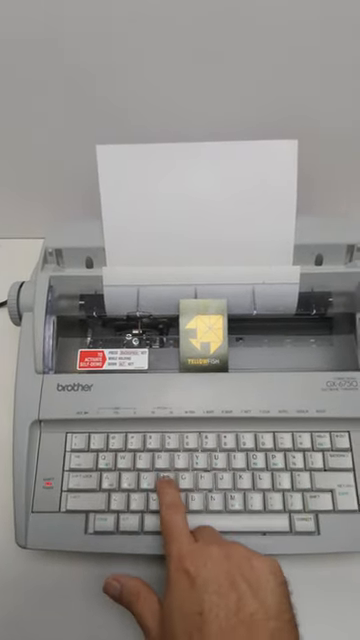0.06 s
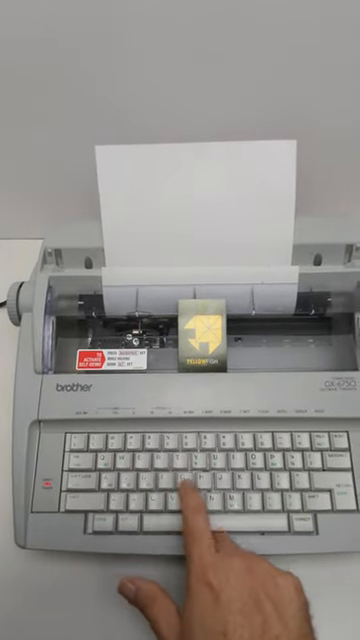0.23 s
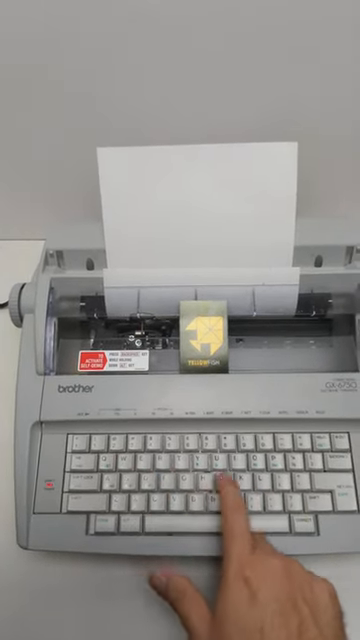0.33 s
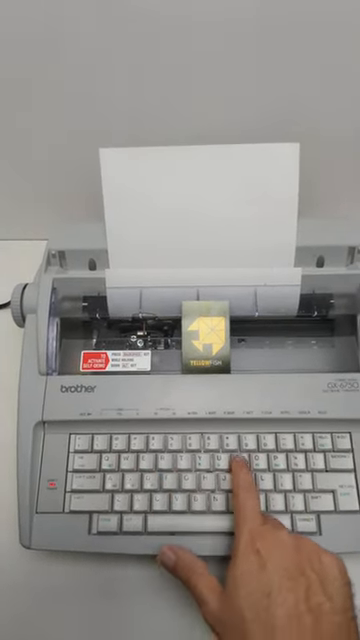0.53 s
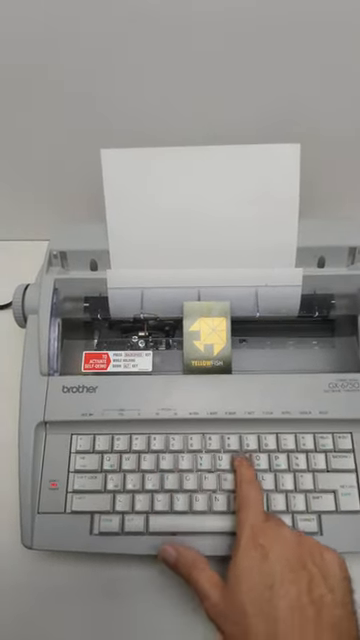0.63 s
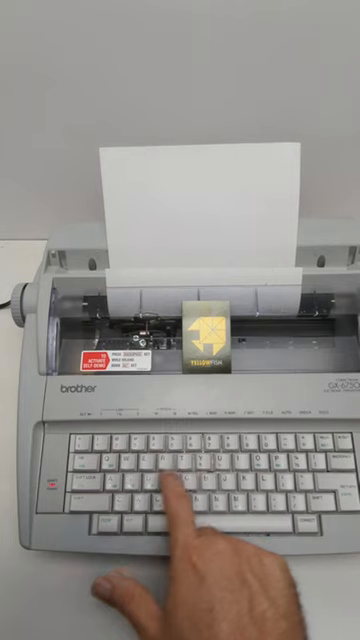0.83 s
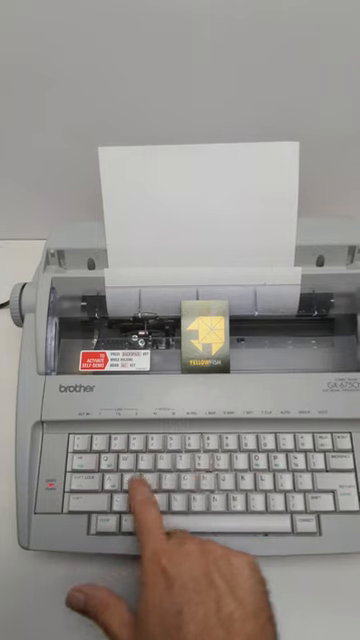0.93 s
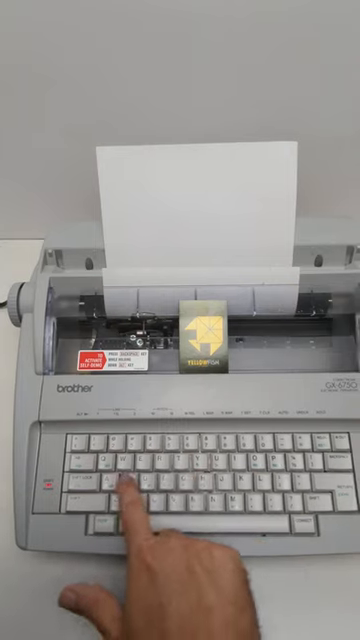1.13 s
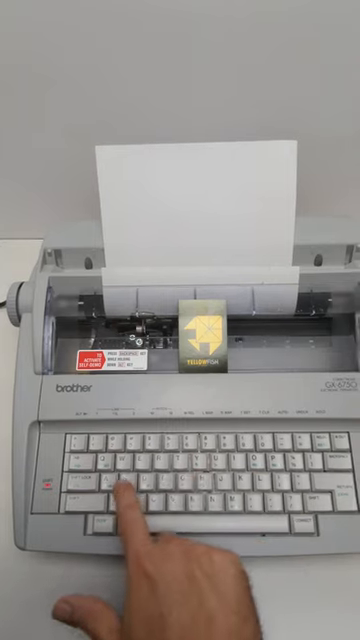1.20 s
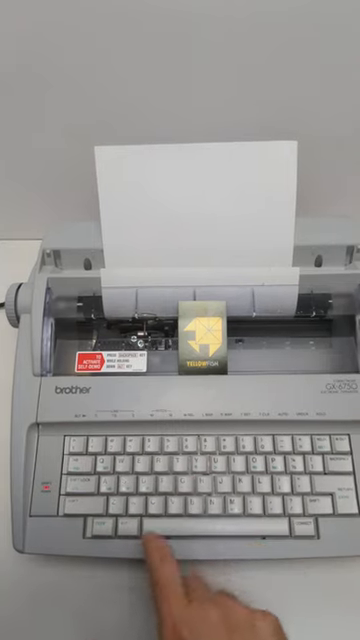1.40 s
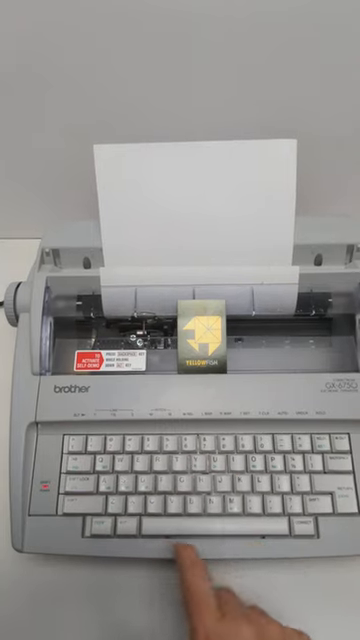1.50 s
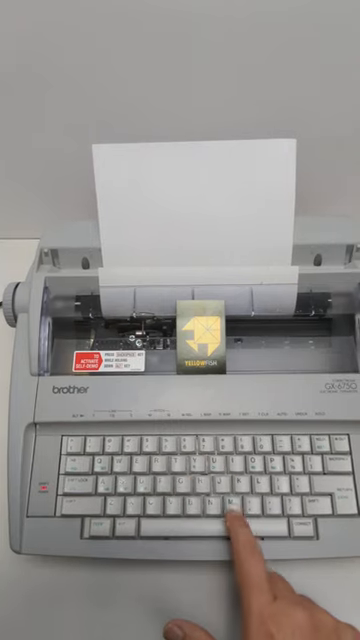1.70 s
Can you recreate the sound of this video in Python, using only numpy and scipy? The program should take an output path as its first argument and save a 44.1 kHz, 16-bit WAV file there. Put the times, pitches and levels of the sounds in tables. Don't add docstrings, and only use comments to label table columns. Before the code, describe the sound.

An electronic typewriter prints three single letters about half a second apart; each brings a light key click, a short fine whir, then a hard bright clack with a quick bounce, close microphone, small indoor room.

```python
import sys
import numpy as np
from scipy import signal
from scipy.fft import rfft, irfft, next_fast_len
from scipy.io import wavfile
from scipy.ndimage import uniform_filter1d

SR = 44100
rng = np.random.default_rng(int(sys.argv[2]) if len(sys.argv) > 2 else 0)


def linear_from_db(decibels):
    return 10 ** (np.asarray(decibels, float) / 20)


def generate_wav(sig):
    pcm = np.round(np.clip(np.atleast_2d(sig).T, -1, 1) * 32767).astype(np.int16)
    wavfile.write(sys.argv[1], SR, pcm)


N = 77175


def evened(x):
    return x / np.sqrt(np.mean(x ** 2) + 1e-20)


def smoothed(x, size, axis=-1):
    return uniform_filter1d(uniform_filter1d(x, size, axis), size, axis)


def read(points, hz):
    f, value = np.transpose(points)
    return np.interp(np.log(hz + 1), np.log(f + 1), value)


def add(mix, s, sound):
    part = mix[..., round(s * SR):][..., :sound.shape[-1]]
    part += sound[..., :part.shape[-1]]


def hum():
    # frequency in Hz, density in dB per Hz.
    air_tone = [(25, -20), (55, -1), (120, -4), (190, -17), (300, -15), (600, -28), (2500, -31),
                (16000, -52)]
    # frequency in Hz, level in dB.
    lines = [(59.2, -66), (82, -66), (120, -66), (290, -70)]
    air_db, patch_db, line_waver_db = -60, 3, 3
    frames, hz, t = N // 512 + 5, np.fft.rfftfreq(2048, 1 / SR), np.arange(N) / SR
    a, b, c, d, patches = rng.standard_normal((frames, 1025, 5)).T
    patches = evened(uniform_filter1d(uniform_filter1d(patches, 8, 0), 5, 1))
    level_db = read(air_tone, hz)[:, None] + patch_db * patches
    spectra = np.array([a + 1j * b, c + 1j * d]) * linear_from_db(level_db)
    air = evened(signal.istft(spectra, nperseg=2048, noverlap=1536)[1][:, :N])
    mains = np.zeros(N)
    for f, db in lines:
        waver = evened(smoothed(rng.standard_normal(N), 2000))
        mains += linear_from_db(db + line_waver_db * waver) * np.sin(2 * np.pi * f * t)
    return linear_from_db(air_db) * air + mains


def rattle(per_s, decay_s, first=3.0):
    draw, t = rng.random((3, 5000)), np.arange(5000) / SR
    size = linear_from_db(-3.0 * np.log(draw[1]))
    clicks = (draw[0] < per_s / SR) * np.sign(draw[2] - .5) * size
    clicks[0] = first
    clicks = clicks * np.exp(-t / decay_s)
    return clicks / np.linalg.norm(clicks)


def case(count=400):
    # frequency in Hz, t60 in seconds.
    case_t60 = [(200, .06), (1000, .05), (4000, .04), (12000, .035)]
    # frequency in Hz, level in dB.
    case_colour = [(100, -5), (220, -7), (330, -3), (450, 0.5), (950, 1), (1350, -3), (2500, 0.5),
                   (3200, -2.5), (4700, 1), (16000, 0.5)]
    t, draw = np.arange(2400) / SR, rng.random((count, 5))
    hz = (np.arange(count) + draw[:, 0]) * 16500 / count
    t60 = read(case_t60, hz) * linear_from_db(6 * (draw[:, 1] - .5))
    modes = np.exp((2j * np.pi * hz - np.log(1000) / t60)[:, None] * t)
    phase = np.exp(2j * np.pi * draw[:, 3:].T)
    pick = (draw[:, 2] + .5) / np.sqrt(t60) * phase
    z = rfft((pick @ modes).real, 4096)
    z = z / np.sqrt(smoothed(abs(z) ** 2, 24))
    gain = linear_from_db(read(case_colour, np.fft.rfftfreq(4096, 1 / SR)))
    return irfft(z * gain)[:, :2400]


def colour(x, tone):
    log_gain = np.log(linear_from_db(read(tone, abs(np.fft.fftfreq(4096, 1 / SR)))))
    knock = np.fft.ifft(np.exp(np.conj(signal.hilbert(log_gain)))).real[:2048]
    knock = knock / np.linalg.norm(knock)
    taps = signal.fftconvolve(knock[None], case(), axes=1)
    return signal.oaconvolve(x, taps, axes=1)[:, :x.shape[1]]


def rings(modes, rise_s):
    t = np.arange(SR) / SR
    total = np.zeros(SR)
    for hz, db, t60 in modes:
        total += linear_from_db(db - 60 * t / t60) * np.sin(2 * np.pi * hz * t)
    return total * (1 - np.exp(-t / rise_s))


def keys():
    # time in seconds, click in dB, thud in dB, rattle decay in seconds.
    contacts = [
        (.080, -35, -52, .012),
        (.192, -49, -44, .02),
        (.634, -46, -56, .004),
        (.639, -40, -50, .006),
        (.7235, -48, -41, .016),
        (1.112, -64, -60, .006),
        (1.121, -70, -47, .010),
    ]
    # time in seconds, level in dB, rattle decay in seconds.
    touches = [(.061, -47, .01), (.592, -57, .012), (.606, -49, .014), (1.105, -55, .008),
               (1.19, -54, .025)]
    # frequency in Hz, level in dB.
    click_tone = [(88, -33), (150, -3), (1790, -6), (2220, -9), (4410, -2), (7180, -13), (9260, -8),
                  (16000, -22)]
    thud_tone = [(88, -40), (250, -9), (450, 0), (650, -14), (1500, -19), (4320, -23), (8400, -42),
                 (16000, -52)]
    touch_tone = [(88, -37), (400, -10), (700, -12), (1800, -6), (4200, -7), (6000, -15), (7500, -30),
                  (16000, -44)]
    # frequency in Hz, level in dB, t60 in seconds.
    plate_modes = [(415, -2, .12), (465, -3, .08), (550, -8, .06)]
    key_db, plate_db = 31, 4
    click, thud, touch, plate = np.zeros((4, 2, N))
    ring = rings(plate_modes, .004)
    for s, click_db, thud_db, decay_s in contacts:
        add(click, s, linear_from_db(click_db + key_db) * rattle(4000, decay_s))
        add(thud, s, linear_from_db(thud_db + key_db) * rattle(1200, 1.3 * decay_s))
        add(plate, s, linear_from_db(thud_db + plate_db) * ring)
    for s, db, decay_s in touches:
        add(touch, s, linear_from_db(db + key_db) * rattle(3000, decay_s))
    struck = colour(click, click_tone) + colour(thud, thud_tone) + colour(touch, touch_tone)
    return struck + plate


def wheel():
    # start in seconds, end in seconds, level in dB.
    spins = [
        (.1, .236, -50),
        (.65, .779, -51),
        (1.14, 1.241, -50),
    ]
    # frequency in Hz, level in dB.
    spin_tone = [(88, -53), (150, -23), (297, -1), (406, -19), (475, -7), (790, -11), (4080, -18),
                 (16000, -40)]
    steps_per_s, edge_s = 2500, .015
    t, draw = np.arange(N) / SR, rng.random((2, 2, N))
    ticks = evened((draw[0] < steps_per_s / SR) * (draw[1] - .5))
    turning = np.zeros(N)
    for start, end, db in spins:
        turning += linear_from_db(db) * np.clip(np.minimum(t - start, end - t) / edge_s, 0, 1)
    return colour(ticks * turning, spin_tone)


def printer():
    # hammer blow in seconds, peak in dB.
    blows = [
        (0.268, -4),
        (0.811, -5),
        (1.273, -5),
    ]
    # seconds after the blow, level in dB, rattle clicks per second, rattle decay in seconds.
    fire = (-.0338, -5, 3500, .022)
    blow = (.0004, 1.5, 3000, .007)
    bounce = (.0105, -3, 4000, .010)
    settle = (.061, -12, 2500, .02)
    # frequency in Hz, level in dB.
    fire_tone = [(88, -50), (150, -20), (414, -9), (2220, -10), (2500, -10), (4490, -1), (7470, -12),
                 (11900, -7), (16000, -19)]
    blow_tone = [(88, -32), (200, -9), (480, -3), (1300, -9), (2500, -3), (4600, 0), (7320, -14),
                 (12200, -14), (16000, -24)]
    bounce_tone = [(88, -36), (200, -11), (450, -2), (1400, -11), (2600, -5), (4800, -4), (7620, -14),
                   (10500, -6), (16000, -18)]
    settle_tone = [(88, -39), (150, -9), (457, 1), (1140, -8), (4320, -11), (7770, -24), (10400, -20),
                   (16000, -33)]
    # frequency in Hz, level in dB, t60 in seconds.
    frame = [(337, -33, .2), (432, -21, .13), (460, -28, .1), (630, -33, .12), (740, -36, .12),
             (925, -30, .17), (2500, -29, .07), (4400, -30, .08), (10160, -33, .07)]
    wire = [(414.5, -41, 1.6), (421, -46, .6), (1244, -65, 1.5), (1658, -51, 1.4)]
    coil = [(440, -38, .1), (1835, -31, .07), (4760, -30, .06), (6410, -28, .05)]
    # seconds after the blow, frequency in Hz, level in dB, t60 in seconds.
    desk = [(.002, 72, -30, .12), (.058, 56, -34, .18), (.002, 118, -36, .1), (.062, 105, -38, .12),
            (.15, 300, -44, .2)]
    knock_db, ring_db = 15, 3
    fresh_db = -2

    knocks, low = np.zeros((2, N)), np.zeros(N)
    contacts = [(fire, fire_tone), (blow, blow_tone), (bounce, bounce_tone), (settle, settle_tone)]
    for (lag, db, per_s, decay_s), tone in contacts:
        habit, part = rattle(per_s, decay_s), np.zeros((2, N))
        for s, peak_db in blows:
            fresh = np.array([rattle(per_s, decay_s), rattle(per_s, decay_s)])
            add(part, s + lag, linear_from_db(peak_db + db + knock_db) * (habit + linear_from_db(fresh_db) * fresh))
        knocks += colour(part, tone)

    sounds = [(0, rings(frame, .002) + rings(wire, .01)), (fire[0], rings(coil, .002))]
    sounds += [(lag, rings([mode], .012)) for lag, *mode in desk]
    for s, peak_db in blows:
        for lag, sound in sounds:
            add(low, s + lag, linear_from_db(peak_db + ring_db) * sound)
    return knocks + low


def room(x):
    # frequency in Hz, t60 in seconds.
    room_t60 = [(150, .6), (600, .44), (2000, .48), (5000, .42), (13000, .34)]
    room_db, gap_s = -10, .006
    taps = np.zeros((2, SR))
    at = np.arange(0, SR - 12, 12) + rng.integers(0, 12, (2, (SR - 1) // 12))
    np.put_along_axis(taps, at, rng.choice([-1., 1.], at.shape), 1)
    hz, t, z = signal.stft(taps, SR, nperseg=256)
    fall_db = -60 * t / read(room_t60, hz)[:, None]
    tail = signal.istft(z * linear_from_db(fall_db), SR, nperseg=256)[1]
    tail = tail * np.clip(np.arange(tail.shape[1]) / SR / gap_s - 1, 0, 1)
    return linear_from_db(room_db) * signal.fftconvolve(x, tail / np.linalg.norm(tail[0]), axes=1)[:, :N]


def scene():
    near = keys() + wheel() + printer()
    return near + room(near) + hum()


def band_limit(x):
    return signal.sosfilt(signal.butter(12, 16970, fs=SR, output="sos"), x)


def record(dry):
    # frequency in Hz, side level in dB.
    side_gain = [(60, -18), (440, -14), (600, -.5), (1200, 2.5), (3000, 1.2)]
    # frequency in Hz, right microphone level in dB.
    right_tone = [(400, 0), (620, 3), (1400, -1), (4000, -3), (6000, 1), (9000, 0), (12000, -11),
                  (15500, -28)]
    low_hz, edge_hz, ceiling = 45, 15950, 1.6
    size = next_fast_len(N + 4096)
    hz, (left, right) = np.fft.rfftfreq(size, 1 / SR), rfft(dry, size)
    mid = (left + right) / 2
    side = (left - right) / 2 * linear_from_db(read(side_gain, hz))
    band = 1 / np.sqrt((1 + (low_hz / (hz + 1)) ** 8) * (1 + (hz / edge_hz) ** 140))
    pair = np.array([mid + side, (mid - side) * linear_from_db(read(right_tone, hz))])
    out = irfft(pair * band, size)[:, :N]
    return band_limit(ceiling * np.tanh(out / ceiling))


dry = scene()
out = record(dry)
generate_wav(out)
```